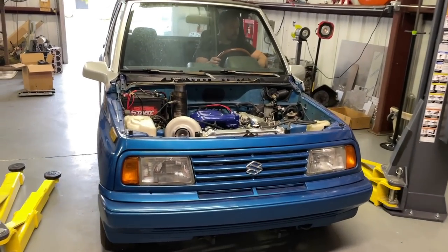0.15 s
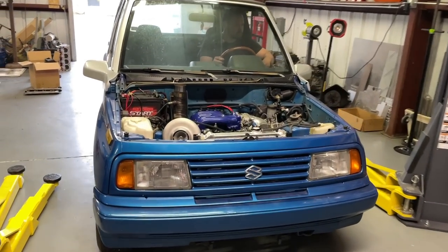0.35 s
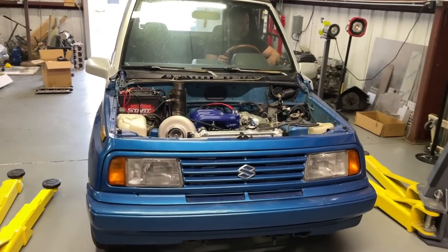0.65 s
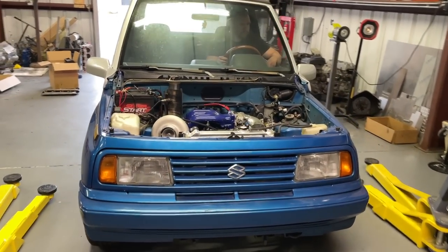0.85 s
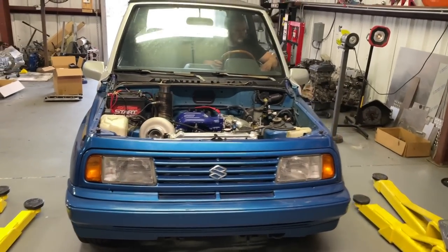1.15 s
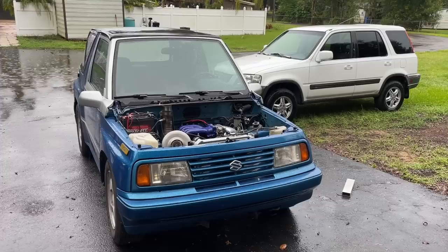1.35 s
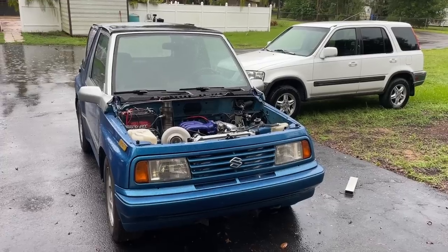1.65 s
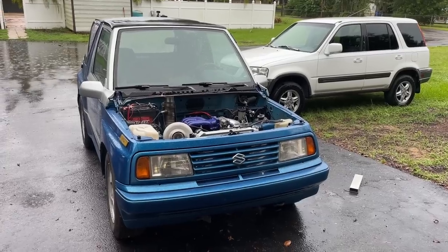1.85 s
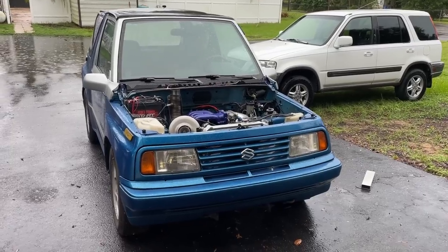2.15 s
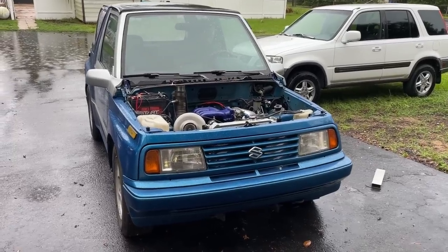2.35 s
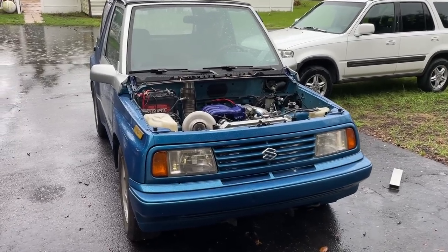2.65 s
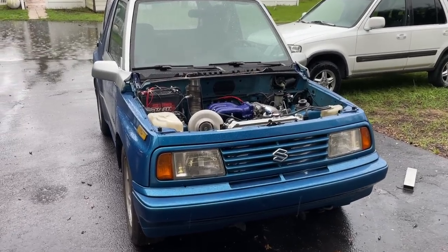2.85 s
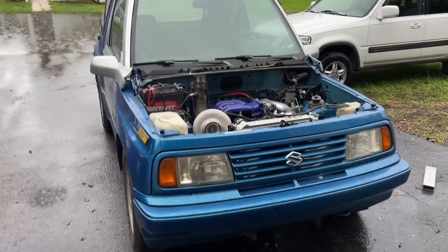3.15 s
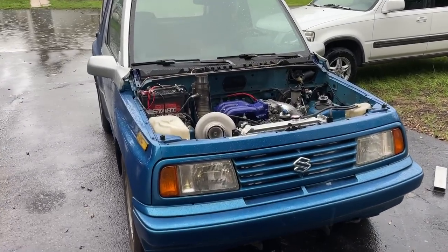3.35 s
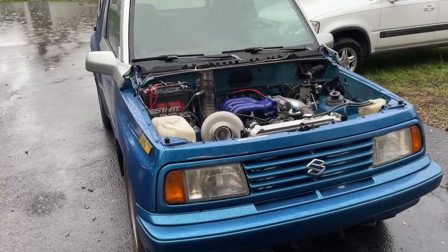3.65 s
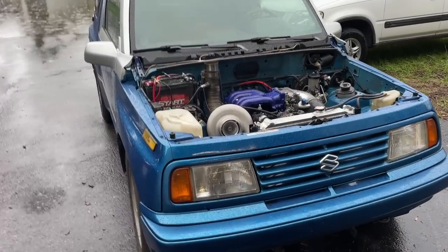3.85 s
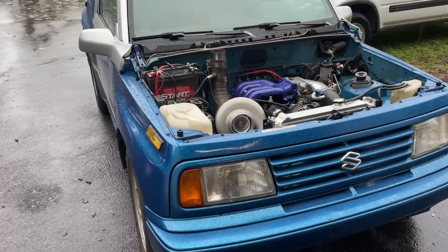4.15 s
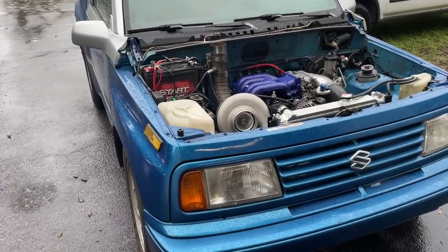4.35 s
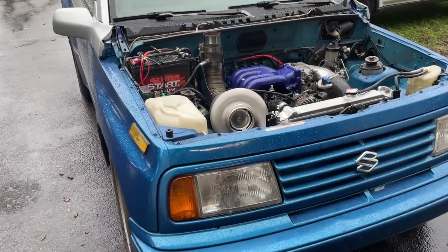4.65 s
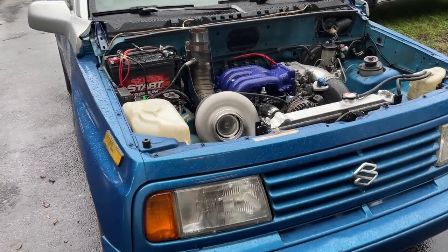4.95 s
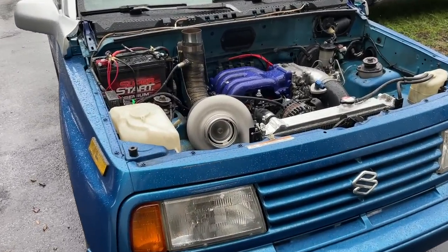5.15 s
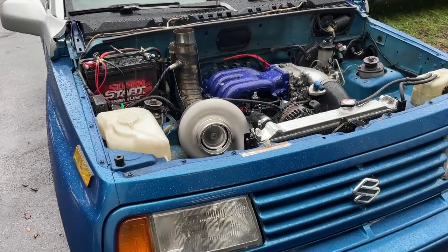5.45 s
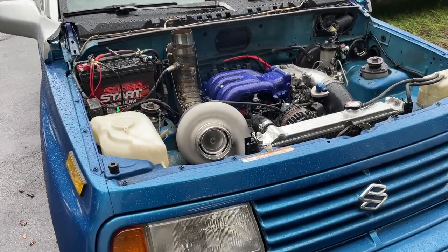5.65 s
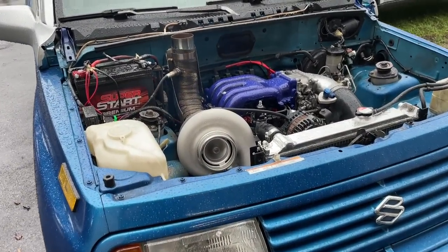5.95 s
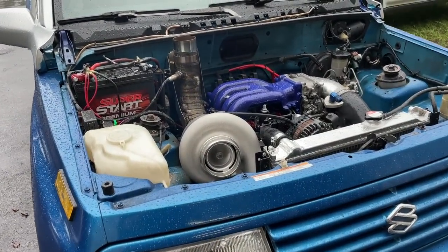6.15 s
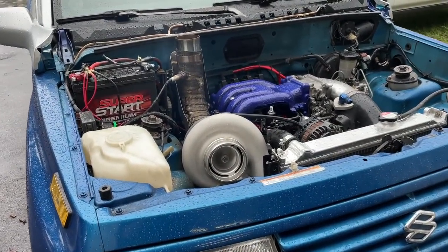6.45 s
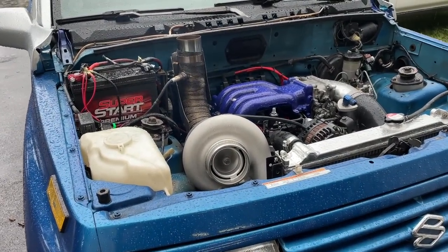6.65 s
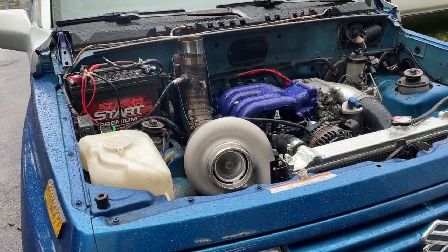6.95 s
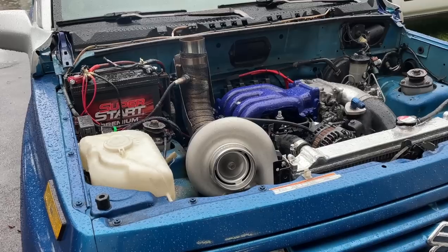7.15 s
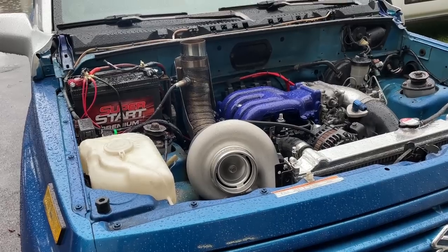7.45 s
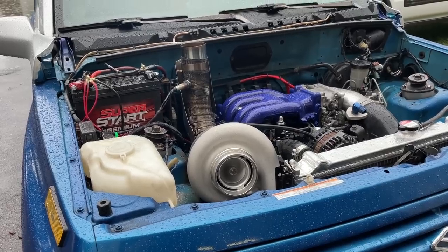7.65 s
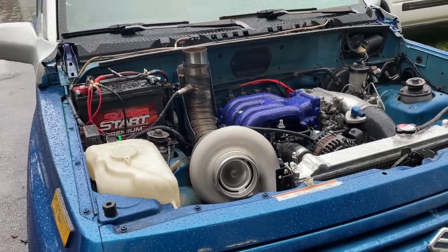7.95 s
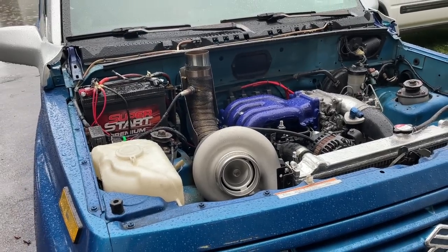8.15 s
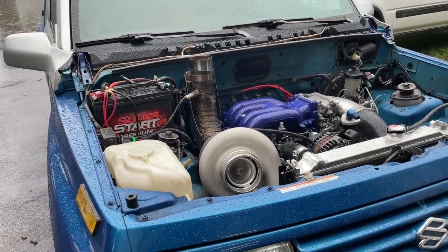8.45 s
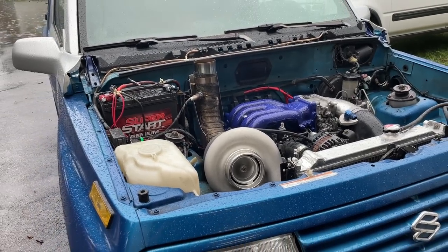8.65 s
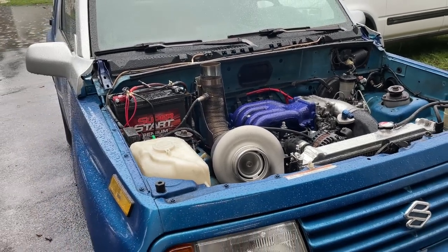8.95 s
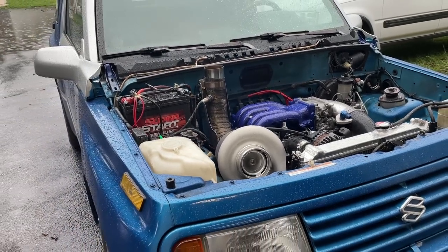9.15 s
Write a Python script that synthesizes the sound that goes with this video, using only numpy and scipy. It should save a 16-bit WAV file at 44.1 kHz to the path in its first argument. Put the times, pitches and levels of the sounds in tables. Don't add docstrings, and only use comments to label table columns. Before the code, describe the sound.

Lumpy rotary engine idle indoors cuts to a misfiring idle outside, with four rasping revs, dull throbbing run-downs and thin falling turbo whistles.

```python
import sys
import numpy as np
from scipy import signal
from scipy.fft import rfft, irfft, next_fast_len
from scipy.io import wavfile
from scipy.ndimage import uniform_filter1d

SR = 44100
rng = np.random.default_rng(int(sys.argv[2]) if len(sys.argv) > 2 else 0)


def wrap_up_sound(samples):
    columns = np.atleast_2d(samples).T
    tamed = np.clip(columns, -1, 1)
    steps = np.round(tamed * 32767).astype(np.int16)
    wavfile.write(sys.argv[1], SR, steps)


def invert_db(x):
    u = np.asarray(x, float) / 20
    return 10 ** u


N = 410122
TIME = np.arange(N) / SR


def in_time(rows):
    s, *columns = np.transpose(rows)
    return [np.interp(TIME, s, c) for c in columns]


def at_hz(points, hz):
    f, v = np.transpose(points)
    return np.interp(np.log(hz + 1), np.log(f + 1), v)


def since(start_s, decay_s):
    return (TIME >= start_s) * np.exp(-np.maximum(TIME - start_s, 0) / decay_s)


def rms_one(x):
    return x / np.sqrt(np.mean(x ** 2) + 1e-20)


def coloured(spectrum):
    size = next_fast_len(N)
    gain = invert_db(at_hz(spectrum, np.fft.rfftfreq(size, 1 / SR)))
    return rms_one(irfft(rfft(rng.standard_normal(size)) * gain, size)[:N])


def body(modes, alternate=-1):
    t = TIME[:SR // 8]
    ring = 0
    for k, (hz, width_hz, db) in enumerate(modes):
        fade = width_hz * np.exp(-np.pi * width_hz * t)
        ring = ring + invert_db(db) * fade * np.sin(2 * np.pi * hz * t) * alternate ** k
    ring = ring * (1 - np.exp(-t / .0008))
    return ring / np.sqrt(np.sum(ring ** 2))


def puff(decay_s):
    t = TIME[:SR // 20]
    shape = (1 - np.exp(-t / 0.0014)) * np.exp(-t / decay_s)
    return shape / np.sqrt(np.sum(shape ** 2))


def beats(at_s, sizes, per_s, answer):
    at = np.clip((at_s * SR).round().astype(int), 0, N - 1)
    clicks = np.bincount(at, sizes * np.sqrt(SR / per_s[at]), N)
    return signal.fftconvolve(clicks, answer)[:N]


def firings(per_s, marks_s):
    cycles = np.cumsum(per_s) / SR
    at_marks = np.interp(marks_s, TIME, cycles)
    whole = np.cumsum(np.diff(at_marks, prepend=at_marks[0]).round())
    cycles = cycles + np.interp(TIME, marks_s, whole - at_marks)
    count = np.arange(np.ceil(cycles[0]), cycles[-1])
    return cycles, count.astype(int), np.interp(count, cycles, TIME), whole.astype(int)


MISFIRES = [1.519, 1.688, 1.716, 1.857, 2.024, 2.053, 2.222, 2.361, 2.478, 2.618, 4.199, 4.483, 6.039,
            6.740, 6.867, 6.917, 7.022, 7.049, 7.206, 7.260, 7.365, 8.738, 8.793, 8.869, 8.925, 9.005]
# t/s of the firing that ends the gap, firings
STUMBLES = [(1.576, 3), (1.814, 2), (3.926, 1), (4.048, 8), (4.154, 2), (5.766, 1), (5.816, 4), (5.836, 1),
            (5.887, 1), (5.919, 2), (5.941, 1), (5.963, 1), (8.540, 4), (8.559, 1), (8.610, 1), (8.630, 1),
            (8.662, 2), (8.684, 1)]
# f/Hz, width f/Hz, level/dB
BOOM = [(149, 86, -9.5), (227.8, 36.5, -2.5), (282.4, 33, 0.5), (356, 39, -12.5)]
# f/Hz, width f/Hz, level/dB
BARK = [(710.6, 57, 8), (867, 23, -3), (1118, 62, -9), (1327, 106, 1), (1593, 100, -8), (1877, 220, -14.5),
        (2538, 37, -20)]
# f/Hz, width f/Hz, level/dB
SNARL = [(409, 58, -1), (599, 153, 3.5), (925, 33, 1), (1269, 190, 2.5), (1703, 310, -7), (2720, 120, -5)]
# f/Hz, level/dB per Hz
SPIT = [(900, -37), (1400, -40), (1950, -4), (2650, -10.5), (3700, -1), (4900, 1), (5800, -3), (7000, -2.5),
        (9000, 9), (12000, -5.5), (15800, -6)]
# f/Hz, width f/Hz, level/dB
TICK = [(5180, 330, -3), (3300, 200, -10)]


def outdoor_engine(per_s, pedal):
    marks_s, missed = np.transpose(sorted(STUMBLES + [(s, 1) for s in MISFIRES]))
    cycles, count, at_s, whole = firings(per_s, marks_s)
    fired = np.ones(len(count))
    for end, gap in zip(whole - count[0], missed.astype(int)):
        fired[end - gap:end] = 0
        fired[end] = 1.024
    shut = sum((at_s > shut_s) & (at_s < fuel_s) for open_s, shut_s, fuel_s, top in REVS)
    fired[shut > 0] = 0
    chance = rng.standard_normal((len(count), 4))
    rotor = count % 2
    slow = 75 / np.interp(at_s, TIME, per_s)
    at_s = at_s + .0004 * rotor * slow
    at_s = at_s + .00005 * slow * chance[:, 0]
    thud_db, boom_db, bark_db, spit_db = (np.interp(at_s, TIME, c) for c in combustion(per_s, *pedal))

    charge = fired * invert_db(-3 * rotor * slow + 1.1 * slow * chance[:, 1])
    boom = beats(at_s + 0.0011, -charge * invert_db(boom_db), per_s, body(BOOM))
    sharp = fired * invert_db(-2 * rotor * slow + 1.8 * slow * chance[:, 2])
    bark = beats(at_s, sharp * invert_db(bark_db), per_s, body(BARK))
    bark += beats(at_s, -sharp * invert_db(bark_db + 9 - 17.4 * slow), per_s, body(SNARL))

    rasp_colour = coloured([(450, -27), (800, -42), (1050, -0.5), (1350, -3.0), (1900, -3.5),
                            (2250, -11), (2700, -9.5), (3200, -15), (4000, -21.5)])
    rasp_db = bark_db - 4.5 - 6 * slow - 2 * rotor + 1.5 * chance[:, 3]
    rasp = beats(at_s, sharp * invert_db(rasp_db), per_s, puff(.004)) * rasp_colour
    spit_size = sharp * invert_db(spit_db - 2 * rotor + 3.5 * chance[:, 3])
    spit = beats(at_s, spit_size, per_s, puff(.0022)) * coloured(SPIT)
    tick_size = sharp * invert_db(spit_db - 11 - 4 * rotor + 3.5 * chance[:, 1])
    tick = beats(at_s, tick_size, per_s, body(TICK))

    swing = uniform_filter1d(np.interp(TIME, at_s, fired * invert_db(thud_db)), size=300)
    thud = np.sqrt(2) * swing * np.sin(2 * np.pi * cycles + 2.25)
    pump = pumping(per_s, cycles, at_s, fired, shut, rotor, chance[:, 2])
    return thud + boom + bark + rasp + spit + tick + pump


# f/Hz, level/dB
THUD = [(70, -26), (90, -26), (105, -33), (140, -30), (165, -30), (190, -18), (215, -5)]


def combustion(per_s, throttle, crack, catch):
    idle_db, octaves = in_time(IDLE)[1], np.log2(per_s / 120)
    boom = -10.5 - 2 * octaves + 0 * crack
    bark = -16 - 4.5 * octaves - 1.5 * crack
    spit = -35 + 12.5 * octaves + 28 * crack
    idle = [idle_db, idle_db - 14, idle_db - 22.5 + 7.5 * catch]
    thud = at_hz(THUD, per_s) + 13.5 * crack * throttle
    return [thud] + [a + throttle * (b - a) for a, b in zip(idle, (boom, bark, spit))]


# t/s, firing rate f/Hz, strength level/dB
IDLE = [(1.38, 71.2, -15.5), (2.1, 69, -14), (2.63, 70.7, -13.5), (3.9, 103, -15), (4.06, 93, -11),
        (4.48, 87.5, -10), (5.71, 105, -13.5), (5.86, 108, -14), (6.03, 91.5, -13), (6.48, 84.3, -14.5),
        (7.01, 80.2, -14), (7.35, 75.5, -13), (8.49, 96, -19), (8.56, 89, -13.5), (8.75, 82.6, -14.5),
        (9.08, 91, -15.5), (9.13, 83.4, -14.5)]
# throttle opens t/s, shuts t/s, fuel returns t/s, top firing rate f/Hz
REVS = [
    (2.635, 3.303, 3.9, 203),
    (4.483, 5.074, 5.715, 216),
    (7.36, 7.922, 8.478, 193),
    (9.13, 9.7, 10.3, 205),
]


def driver():
    per_s, throttle, crack, catch = in_time(IDLE)[0], np.zeros(N), np.zeros(N), np.zeros(N)
    eager = .12
    friction_per_s = 1.15
    for open_s, shut_s, fuel_s, top in REVS:
        way = (TIME - open_s) / (shut_s - open_s)
        low = np.interp(open_s, TIME, per_s)
        climb = low + (top - low) * (way + eager * way * (1 - way))
        per_s = np.where((way > 0) & (way <= 1), climb, per_s)
        per_s = np.where((way > 1) & (TIME < fuel_s), top * since(shut_s, 1 / friction_per_s), per_s)
        throttle += np.clip((TIME - open_s) / 0.068, 0, 1) * (way <= 1)
        crack += since(open_s, 0.13)
        catch += since(fuel_s, .15)
    return uniform_filter1d(per_s, size=600), throttle, crack, catch


# f/Hz, width f/Hz, level/dB
PUMP_BODY = [(265, 52, 6.5), (179, 19, 3)]
# f/Hz, width f/Hz, level/dB
COAST_BODY = [(420, 120, -3), (600, 120, 0), (850, 150, -3), (1310, 80, -4)]


def pumping(per_s, cycles, at_s, fired, shut, rotor, chance):
    miss_db = np.interp(at_s, TIME, in_time(IDLE)[1]) - 7.5 - 5 * rotor
    missed = (fired == 0) * (1 - shut) * invert_db(miss_db)
    pump = beats(at_s + 0.0018 * rotor, missed, per_s, body(PUMP_BODY))
    pump += beats(at_s, shut * invert_db(-38 - 4 * rotor + .8 * chance), per_s, body(COAST_BODY))
    pump += coasting(cycles, per_s)
    pump += np.interp(TIME, at_s, shut) * invert_db(-38 - 10 * 75 / per_s) * np.sin(np.pi * cycles)
    return pump


# firing rate f/Hz, then level/dB of 1, 1.5, 2 and 4 times that rate
COAST = [(98, -33, -59, -21.5, -65), (119, -30.5, -39, -24, -98), (136, -29.5, -35, -30, -79),
         (153.6, -30, -24.5, -36.5, -31.5), (169, -26.5, -28.5, -50, -41), (203.9, -30, -30.5, -67, -35)]


def coasting(cycles, per_s):
    on = sum(np.clip(np.minimum(TIME - shut_s, fuel_s - TIME) / .01, 0, 1)
             for open_s, shut_s, fuel_s, top in REVS)
    speeds, *levels = np.transpose(COAST)
    tones = sum(invert_db(np.interp(per_s, speeds, db)) * np.sin(2 * np.pi * order * cycles + order)
                for order, db in zip((1, 1.5, 2, 4), levels))
    return np.sqrt(2) * on * tones


# t/s, shaft turning rate f/Hz, nearness level/dB
SHOP = [
    (0.0, 49.2, -24),
    (0.19, 48.8, -20.5),
    (0.6, 48.0, -19.5),
    (1.0, 48.5, -20.5),
    (1.38, 49.4, -22),
]
# f/Hz, width f/Hz, level/dB
SHOP_THUD = [(103, 54, -3), (46.3, 18, -14.5)]
# f/Hz, width f/Hz, level/dB
SHOP_BOOM = [(135, 8.2, -17), (194.6, 8, -3.5), (231.1, 18.4, 2.5)]
# f/Hz, width f/Hz, level/dB
SHOP_BARK = [(388, 29, 3.5), (580, 75, 4), (700, 290, 1), (920, 26, -3.5), (1290, 85, -3), (1619, 56, -2.5)]
# f/Hz, level/dB per Hz
SHOP_HISS = [(900, 5.5), (1500, 0.5), (2000, -3.5), (2800, -6.5), (3800, -1), (5400, -9), (6800, 0),
             (9000, 4), (12000, -2), (15800, -11)]


def workshop_idle():
    turns, boom_db = in_time(SHOP)
    thud_db, bark_db, hiss_db = boom_db + 1, -23, -24.5
    per_s = 2 * turns
    cycles, count, at_s, whole = firings(per_s, [.6132])
    chance = rng.standard_normal((len(count), 3))
    at_s = at_s + .0015 * (count % 2) + .00004 * chance[:, 0]
    size = invert_db(np.array([6, -45, 1.0, -7.0])[count % 4] + 0.18 * chance[:, 1])
    rough = invert_db(np.array([3, -6, 1.5, -7])[count % 4] + .7 * chance[:, 2])
    thud_size = invert_db(-3 * (count % 2))
    thud = -invert_db(thud_db) * beats(at_s - .0012, thud_size, per_s, body(SHOP_THUD, alternate=0.55))
    boom = -invert_db(boom_db) * beats(at_s, size, per_s, body(SHOP_BOOM, alternate=1))
    bark = invert_db(bark_db - 6.0) * beats(at_s - .005, rough, per_s, body(SHOP_BARK))
    gate = .75 + .55 * beats(at_s - .005, rough, per_s, puff(.003))
    rumble_colour = [(250, -30), (480, -14), (800, -3), (1500, 0), (2200, -15)]
    rumble = invert_db(bark_db - 19) * coloured(rumble_colour)
    hiss = invert_db(hiss_db) * coloured(SHOP_HISS)
    return thud + boom + bark + gate * (rumble + hiss)


# from t/s, until t/s, first f/Hz, run-down t/s, level/dB
SPOOLS = [
    (3.4, 4.45, 3890, 1.03, -1),
    (5.13, 7.33, 4740, 1.1, 3),
    (7.9, 9.1, 4130, 1.06, 3),
]
# f/Hz, level/dB
INTAKE = [(2400, -52), (2800, -49), (3050, -46), (3330, -41), (3600, -45), (4000, -49), (4300, -52),
          (4700, -50)]


def turbo():
    out, rest_hz = np.zeros(N), 2100
    flutter = 1 + 0.2 * coloured([(1, -8), (8, 0), (60, -20)])
    for start_s, end_s, first_hz, run_s, db in SPOOLS:
        hz = rest_hz + (first_hz - rest_hz) * since(start_s, run_s)
        on = np.clip(np.minimum(TIME - start_s, end_s - TIME) / 0.032, 0, 1)
        level = np.sqrt(2) * on * invert_db(db + at_hz(INTAKE, hz)) * flutter
        out += level * np.sin(2 * np.pi * np.cumsum(hz) / SR)
    return out


# f/Hz, level/dB per Hz
FAN = [(40, -5), (250, 10), (500, 4), (800, -1.5), (1080, -3.5), (1300, 2.5), (1700, -12), (2600, -8),
       (3500, -8), (4800, -18), (5800, -12), (8500, -10.5), (12000, -12), (15800, -22)]
# f/Hz, level/dB per Hz
STRAY = [(600, -25), (1300, -10), (2400, -5), (3500, -3), (5500, -5), (7500, -30)]


def intake_air(per_s):
    rise_s, fall_s = 0.041, 0.94
    swell = sum((since(open_s, np.inf) - since(open_s, rise_s))
                * np.exp(-np.maximum(TIME - shut_s, 0) / fall_s)
                for open_s, shut_s, fuel_s, top in REVS)
    far_db = -2 * np.clip((WALK_UP_S - TIME) / 0.39, 0, 1)
    air = invert_db(-40.5 + far_db + 11 * np.minimum(swell, 1) - np.log2(per_s / 72))
    stray = invert_db(-5.5) * air * np.array([coloured(STRAY), coloured(STRAY)])
    return invert_db(0.5) * air * coloured(FAN), stray


# t/s, half length t/s, level/dB
GUSTS = [(3.121, 0.04, -19.5), (3.161, 0.0215, -18), (3.276, 0.062, -27), (3.95, 0.027, -25),
         (4.63, 0.018, -16), (4.943, 0.02, -20), (5.057, 0.065, -21.5), (7.51, 0.071, -21.5),
         (7.681, 0.028, -20.5), (7.82, 0.024, -21), (7.877, 0.029, -18.5), (8.598, 0.23, -33)]


def gusts():
    lumps = sum(invert_db(db) * np.exp(-((TIME - s) / half) ** 2) for s, half, db in GUSTS)
    colour = [(15, -64), (45, 8.5), (90, 10.5), (200, -12.0), (400, -30.5)]
    return lumps * (coloured(colour) + 0.12 * coloured(colour) * np.array([[1], [-1]]))


WALK_UP_S = 2.8


def ground_echo(x):
    middle_hz, width_hz = 214, 55
    edges_hz = [middle_hz - width_hz / 2, middle_hz + width_hz / 2]
    dip = signal.sosfilt(signal.butter(1, edges_hz, "band", fs=SR, output="sos"), x)
    return x - 0.83 * np.clip((WALK_UP_S - TIME) / 0.16, 0, 1) * dip


# f/Hz, phase in radians
LEAD = [(60, .1), (300, .3), (950, .9), (2000, .8), (3000, 1.4), (5200, 1.3), (6800, 1.8), (8000, 3.0),
        (9500, 3.17), (10300, 4.4), (11800, 5.4), (12600, 6.283), (16000, 6.283)]
# f/Hz, likeness 0-1
LIKENESS = [(150, .997), (400, .98), (1000, .92), (2500, .86), (5000, .8), (7000, .9), (7800, .994),
            (10000, .994), (12500, .93)]
# f/Hz, level/dB
TILT = [(60, -.8), (380, -1), (700, 1.5), (1400, 2.5), (2800, .5), (5500, 1.8), (7600, 0), (16000, 0)]


def ports(x, scatter_s, at_least=0):
    size = next_fast_len(N + SR // 4)
    hz = np.fft.rfftfreq(size, 1 / SR)
    t = TIME[:SR // 5]
    scatter = rng.standard_normal((2, len(t))) * np.exp(-t / scatter_s)
    scatter /= np.sqrt(np.sum(scatter ** 2, axis=1, keepdims=True))
    alike = np.clip(at_hz(LIKENESS, hz), at_least, 1)
    side = np.array([[.5], [-.5]])
    direct = np.sqrt(alike) * np.exp(1j * side * at_hz(LEAD, hz))
    paths = (direct + np.sqrt(1 - alike) * rfft(scatter, size)) * invert_db(side * at_hz(TILT, hz))
    return irfft(rfft(x, size) * paths, size)[:, :N]


def scene():
    outside = np.clip((TIME - 1.383) / 0.024 + .5, 0, 1)
    per_s, *pedal = driver()
    rush, stray = intake_air(per_s)
    car = ground_echo(outdoor_engine(per_s, pedal)) + rush
    yard = ports(.9 * np.tanh(car / .9), scatter_s=.008)
    yard = yard + ports(turbo(), scatter_s=.004, at_least=1) + stray + gusts()
    return (1 - outside) * ports(workshop_idle(), scatter_s=.012) + outside * yard


def low_pass(x):
    return signal.sosfilt(signal.butter(12, 16380, fs=SR, output="sos"), x)


def record(dry):
    x = signal.sosfilt(signal.butter(2, 40, "high", fs=SR, output="sos"), dry)
    x = signal.sosfilt(signal.cheby2(12, 70, 16450, fs=SR, output="sos"), x)
    mix = np.clip(x, -1, 1)
    return low_pass(mix)


dry = scene()
out = record(dry)
wrap_up_sound(out)
```